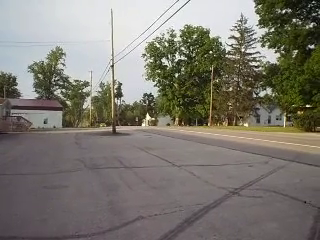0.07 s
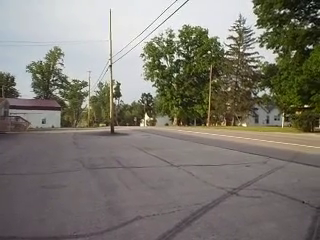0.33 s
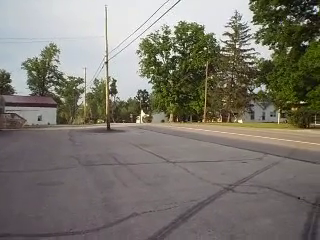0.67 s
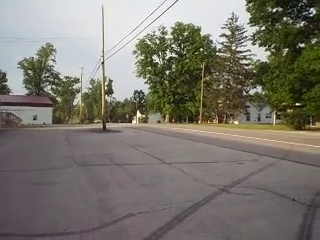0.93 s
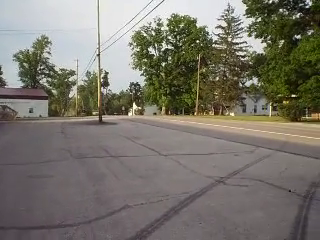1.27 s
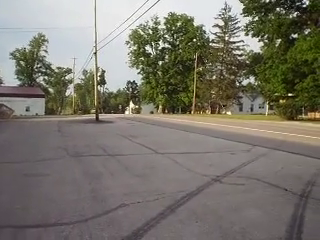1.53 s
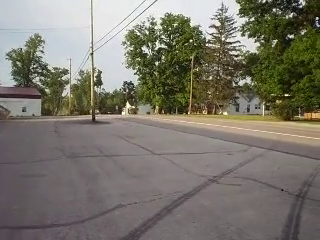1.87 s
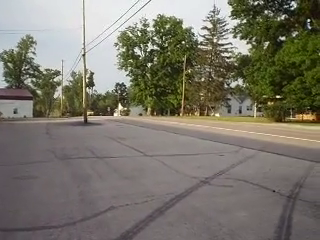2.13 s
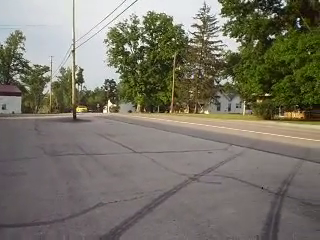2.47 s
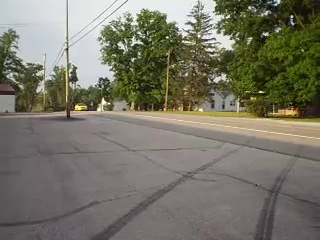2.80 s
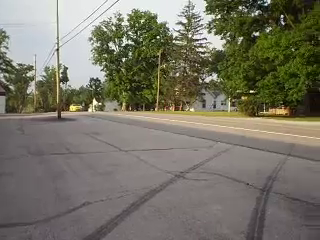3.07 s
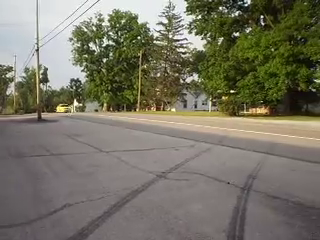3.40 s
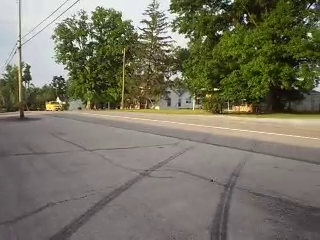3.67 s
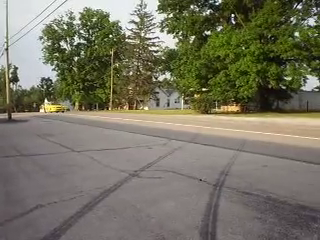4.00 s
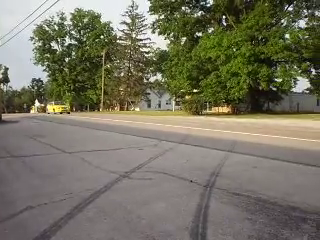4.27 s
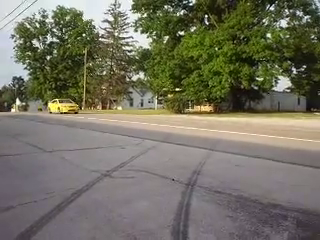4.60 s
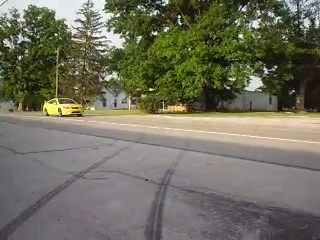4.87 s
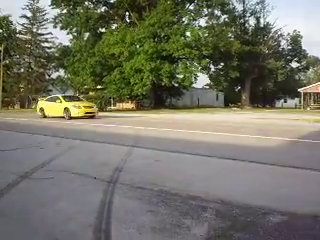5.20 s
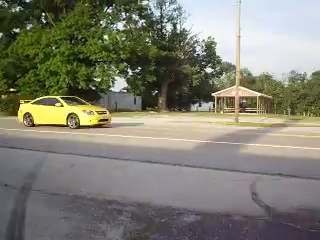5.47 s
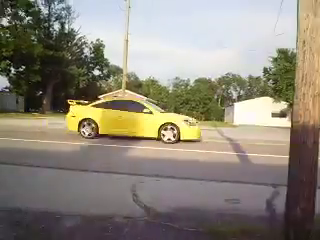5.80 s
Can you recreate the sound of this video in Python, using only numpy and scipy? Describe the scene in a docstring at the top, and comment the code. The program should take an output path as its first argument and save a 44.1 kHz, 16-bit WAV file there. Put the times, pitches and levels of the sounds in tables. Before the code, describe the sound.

Heard from the side of a country road, a faint engine hum builds into the raspy drone of an approaching car. A supercharger whine climbs with it, flaring over a growing rush of exhaust gas and tyres. Near the end the whine collapses, the engine pitch falls, and a quick string of exhaust pops sounds as the tyres roar close by. The sound is slightly muffled.

```python
"""A distant exhaust drone grows as a supercharged four-cylinder car accelerates along a rural road.
The firing note, the tailpipe rasp and the whine of the blower's rotors climb together over gas and
tyre noise, echoed by trees and by the houses left behind. As the car draws level the throttle shuts:
the whine collapses, unburnt fuel pops and burbles in the exhaust, and the tyres roar by."""
import sys
import numpy as np
from scipy import signal
from scipy.fft import rfft, irfft, next_fast_len
from scipy.io import wavfile

SR = 44100
rng = np.random.default_rng(int(sys.argv[2]) if len(sys.argv) > 2 else 0)


def generate_wav(signal):
    """Clip the signal to [-1, 1] and save it as 16-bit WAV at the path in sys.argv[1]."""
    frames = np.transpose(np.atleast_2d(signal))
    scaled = np.clip(frames, -1, 1) * 32767
    pcm = np.round(scaled).astype(np.int16)
    wavfile.write(sys.argv[1], SR, pcm)


N = 257544
TIME = np.arange(N) / SR
ABREAST_S, CAR_M_PER_S, LANE_DISTANCE_M = 5.666, 20.5, 13.38
OPEN_S, SHUT_S, SHUTTING_S = 2.37, 5.432, 0.062   # throttle: two midpoints, one duration
FULL_FIRING_HZ = 185


def from_db(db):
    """Decibels to gain."""
    return 10 ** (np.asarray(db) / 20)


def rms_one(x):
    """Scale to unit power."""
    return x / np.sqrt(np.mean(x ** 2) + 1e-20)


def in_time(curve):
    """A curve's value at every sample."""
    return np.interp(TIME, *np.transpose(curve))


def gain_at(spectrum, hz):
    """Gain of a spectrum at given frequencies."""
    freq_hz, level_db = np.transpose(spectrum)
    return from_db(np.interp(np.log(np.maximum(hz, 1)), np.log(freq_hz), level_db))


def coloured(x, spectrum):
    """Filter by a spectrum."""
    size = next_fast_len(N + SR // 10)
    gain = gain_at(spectrum, np.fft.rfftfreq(size, 1 / SR))
    return irfft(rfft(x, size) * gain, size)[:N]


def noise(spectrum):
    """Coloured noise of unit power."""
    return rms_one(coloured(rng.standard_normal(N), spectrum))


def band(x, kind, hz, order=4):
    """Butterworth filter."""
    return signal.sosfilt(signal.butter(order, hz, kind, fs=SR, output="sos"), x)


def drift(rate_hz):
    """Smooth random wander of unit spread."""
    hop, settle = 40, 2000
    pole = np.exp(-2 * np.pi * rate_hz * hop / SR)
    white = rng.standard_normal(N // hop + settle + 2)
    slow = signal.lfilter([1], [1, -2 * pole, pole * pole], white)[settle:]
    return np.interp(np.arange(N) / hop, np.arange(len(slow)), rms_one(slow))


def delayed(x, delay_s):
    """Delay a signal; a growing delay lowers its pitch."""
    return np.interp(TIME - delay_s, TIME, x, left=0)


def bell(x, centre, width):
    """Gaussian hump of height 1."""
    return np.exp(-((x - centre) / width) ** 2)


def ramp(middle_s, length_s):
    """Linear rise from 0 to 1."""
    return np.clip((TIME - middle_s) / length_s + .5, 0, 1)


# time_s, firing_hz
ENGINE_SPEED = [(0, 107.1), (1.2, 110.6), (1.6, 113.8), (1.92, 114.4), (2.35, 120.3), (2.8, 129.3),
                (3.15, 137.1), (3.75, 149.7), (4.15, 159.4), (4.5, 168.7), (4.85, 177.3), (5.2, 184.9),
                (5.41, 188.8), (5.5, 181.1), (5.84, 156.9)]


def firing_rate_hz():
    """Cylinder firings per second, as heard at the roadside."""
    return in_time(ENGINE_SPEED)


def car_level_db(full_db, per_octave_db, cruise_db, shut_db, lead_s=0.16, opening_s=0.89):
    """Source level from distance, revs and throttle; lead_s advances its response to the opening."""
    distance_m = np.hypot(CAR_M_PER_S * (ABREAST_S - TIME), LANE_DISTANCE_M)
    spreading_db = 20 * np.log10(LANE_DISTANCE_M / distance_m)
    revs_db = per_octave_db * np.log2(firing_rate_hz() / FULL_FIRING_HZ)
    cruising = 1 - ramp(OPEN_S - lead_s, opening_s)
    throttle_db = cruise_db * cruising + shut_db * ramp(SHUT_S, SHUTTING_S)
    return full_db + spreading_db + revs_db + throttle_db


# time_s, level_db
NOTE_LEVEL = [(0.0, -45.5), (1.01, -48), (1.3, -40), (1.69, -41.5), (2.44, -29.5), (2.81, -35), (2.89, -48),
              (2.94, -32.5), (3.11, -46), (3.32, -27), (4.2, -33.5), (4.31, -23), (4.68, -28),
              (4.83, -20.5), (5.01, -28.5), (5.19, -19), (5.29, -34.5), (5.34, -19.5), (5.4, -24),
              (5.43, -30), (5.59, -22.5), (5.84, -31)]
# time_s, level_db
OCTAVE_LEVEL = [(.3, -66), (.6, -55), (1.5, -51.5), (2.33, -53.5), (2.52, -43.5), (2.85, -37), (3.1, -43),
                (3.45, -39.5), (5.1, -31.5), (5.84, -41)]


def exhaust_drone(firing_phase, note_trim_db=-1, third_trim_db=-11):
    """The firing note and its octave swell and fade, with a faint third harmonic."""
    note_db, octave_db = in_time(NOTE_LEVEL), in_time(OCTAVE_LEVEL)
    note = from_db(note_db + note_trim_db + 1.8 * drift(16)) * np.sin(firing_phase)
    octave = from_db(octave_db + 2.5 * drift(6.7)) * np.sin(2 * firing_phase + 1)
    third = from_db(octave_db + third_trim_db + 2 * drift(5.9)) * np.sin(3 * firing_phase)
    return np.sqrt(2) * (note + octave + third)


# freq_hz, relative_db
TAILPIPE_RESPONSE = [(300, -10), (400, -11), (520, -13), (620, -10), (740, -4), (830, 0), (940, 5),
                     (1070, -8), (1450, -11), (2200, -20)]


def exhaust_rasp(firing_phase, firing_hz, uneven_db=-8.5, flutter_db=1.5, jitter_rad=0.055):
    """Higher orders ring in the tailpipe; unequal cylinders add weaker half orders between them."""
    out, power = 0, 0
    unsteady_phase = firing_phase + jitter_rad * drift(25)
    for k in range(7, 21):
        gain = gain_at(TAILPIPE_RESPONSE, firing_hz * k / 2) * from_db(uneven_db * (k % 2))
        flutter = from_db(flutter_db * drift(3.8))
        out += gain * flutter * np.sin(k / 2 * unsteady_phase + rng.uniform(0, 2 * np.pi))
        power += gain ** 2 / 2
    level_db = car_level_db(full_db=-16, per_octave_db=14.5, cruise_db=-14.5, shut_db=-8,
                            lead_s=0.057, opening_s=0.29)
    return from_db(level_db) * out / np.sqrt(power)


# harmonic, relative_db
ROTOR_HARMONICS = [(1, -11), (2, -4), (3, -10.5), (4, -3.5), (5, -15.5), (6, -9.5), (7, -14), (8, -13)]
# harmonic, centre_hz, half_width_hz, gain_db
# The negative row is a brief dip in the main whine from ground reflection.
WHINE_FLARES_AND_DIPS = [(2, 700, 40, 5.5), (2, 795, 35, 13), (2, 993, 100, 18), (3, 1540, 96, 18),
                         (4, 1507, 130, 13), (4, 1962, 126, 23), (4, 2058, 11.6, -20), (4, 2090, 15, 6.5),
                         (5, 2510, 86, 11.5), (6, 2523, 188, 16), (6, 2757, 110, 12), (6, 3090, 115, 13.5),
                         (7, 2872, 170, 17.5), (7, 3398, 220, 14), (8, 2690, 58, 15), (8, 3085, 42, 21.5),
                         (8, 3590, 130, 10.5)]


def supercharger(firing_phase, firing_hz, lobes_per_firing=2.775, belt_jitter_rad=0.045):
    """Two rotors chop the intake air; until the throttle shuts, harmonics flare at certain pitches."""
    whine_db = car_level_db(full_db=-28, per_octave_db=5, cruise_db=-24, shut_db=-18,
                            lead_s=0.11, opening_s=0.16)
    before_shut = 1 - ramp(SHUT_S, SHUTTING_S)
    lobe_hz = lobes_per_firing * firing_hz
    lobe_phase = lobes_per_firing * firing_phase + belt_jitter_rad * drift(39)
    out = 0
    for k, relative_db in ROTOR_HARMONICS:
        flare_db = sum(gain_db * bell(k * lobe_hz, centre_hz, half_width_hz)
                       for harmonic, centre_hz, half_width_hz, gain_db in WHINE_FLARES_AND_DIPS
                       if harmonic == k)
        flutter_db = (1.35 if k <= 4 else 2.5) * drift(16)
        gain = from_db(whine_db + relative_db + before_shut * flare_db + flutter_db)
        out += gain * np.sin(k * lobe_phase + rng.uniform(0, 2 * np.pi))
    return np.sqrt(2) * out


# freq_hz, density_db
RUMBLE_SPECTRUM = [(20, -9), (45, 1.5), (70, -2), (110, -1), (200, -15), (400, -21.5)]
# freq_hz, density_db
RUSH_SPECTRUM = [(150, -14.5), (300, -12), (450, -13.5), (600, -11.5), (720, -0.5), (880, 7.5),
                 (1120, -1.5), (1420, 3.5), (1750, -3.5), (2200, -7.5), (2700, -11.5), (3400, -12.5),
                 (4000, -21), (5000, -45)]


def gas_and_tyres(firing_phase, throb_depth=0.11, flutter_db=0.62, rumble_db=-10):
    """Turbulent gas, tyre noise and road rumble, throbbing a little with each firing."""
    low_db = car_level_db(full_db=-29.5, per_octave_db=6, cruise_db=-8, shut_db=-0.5)
    mid_db = car_level_db(full_db=-16, per_octave_db=8.5, cruise_db=-16, shut_db=-3)
    high_db = car_level_db(full_db=-22, per_octave_db=16, cruise_db=-7.5, shut_db=-1.5)
    out = from_db(low_db + rumble_db) * noise(RUMBLE_SPECTRUM)
    for edges_hz, level_db in ((170, 600), low_db), ((600, 1900), mid_db), ((1900, 4200), high_db):
        rush = rms_one(band(noise(RUSH_SPECTRUM), "band", edges_hz))
        out += rush * from_db(level_db + flutter_db * drift(49))
    return out * (1 + throb_depth * np.sin(firing_phase))


# freq_hz, density_db
AIR_SPECTRUM = [(20, -6.5), (60, 6), (90, -7.5), (160, -6.5), (350, -4.5), (600, -3.5), (780, -3.5),
                (940, -4), (1080, -1.5), (1450, -4.5), (1700, -9), (2300, -9), (3900, -9), (4600, -43)]


def still_air(level_db=-49):
    """Steady hiss of still outdoor air."""
    return from_db(level_db) * noise(AIR_SPECTRUM)


def with_tree_echoes(direct, echo_db=-11, nearest_s=0.03, farthest_s=0.17, sway_s=0.00027, count=6):
    """Direct sound plus echoes off the tree line, their paths slowly shifting as the car moves."""
    wet = from_db(echo_db)
    delays_s = np.linspace(nearest_s, farthest_s, count)
    echoes = sum(delayed(direct, delay_s + sway_s * drift(0.68)) for delay_s in delays_s)
    return (direct + wet * echoes / np.sqrt(count)) / np.sqrt(1 + wet ** 2)


# freq_hz, gain_db
HOUSE_RESPONSE = [(100, -17), (150, -0.5), (280, -2), (430, 4), (560, 11.5), (700, 8), (900, 2),
                  (1500, -4.5), (4000, 0)]


def house_echo(direct, firing_hz, first_delay_s=0.17, facing_s=4.063, half_width_s=0.98):
    """The car leaves the houses behind, so their echo is Doppler-shifted down, more so with speed."""
    doppler_drop = np.maximum(0.1085 + 0.00142 * (firing_hz - FULL_FIRING_HZ), 0)
    delay_s = first_delay_s + np.cumsum(doppler_drop) / SR
    off_axis = 1 - bell(TIME, facing_s, half_width_s)   # the tailpipe sweeps across the houses
    return from_db(2 - 23.5 * off_axis) * coloured(delayed(direct, delay_s), HOUSE_RESPONSE)


# start_s, crack_db, thump_db
FUEL_POPS = [(5.438, -17, -36), (5.449, -15, -28), (5.467, -13, -26), (5.493, -11, -27), (5.537, -19, -24),
             (5.612, -16, -38), (5.654, -18, -38), (5.709, -9.5, -22)]
# freq_hz, density_db
BURBLE_SPECTRUM = [(25, -20.5), (55, -12), (90, 1), (140, 4), (220, -3), (350, -19), (800, -38)]


def exhaust_pops(crack_s=0.0029, ring_hz=906, ring_db=-1, thump_hz=122.5, thump_decay_s=0.024,
                 burble_db=-7, burble_decay_s=0.11):
    """Unburnt fuel pops: each gas burst rings the tailpipe over a low thump and leaves it burbling."""
    gas, burble = noise(RUSH_SPECTRUM), noise(BURBLE_SPECTRUM)
    out = np.zeros(N)
    for start_s, crack_db, thump_db in FUEL_POPS:
        age_s = np.maximum(TIME - start_s, 0)
        ring = from_db(ring_db) * np.sin(2 * np.pi * ring_hz * age_s)
        crack_envelope = (age_s / crack_s) * np.exp(1 - age_s / crack_s)
        crack = crack_envelope * (gas + ring) / np.sqrt(2)
        thump = np.sin(2 * np.pi * thump_hz * age_s) * np.exp(-age_s / thump_decay_s)
        tail = from_db(burble_db) * burble * (age_s > 0) * np.exp(-age_s / burble_decay_s)
        out += from_db(crack_db) * crack + from_db(thump_db) * (thump + tail)
    return out


def scene():
    """One crankshaft drives the exhaust and the blower; mono."""
    firing_hz = firing_rate_hz()
    firing_phase = 2 * np.pi * np.cumsum(firing_hz) / SR
    drone = exhaust_drone(firing_phase)
    rasp = exhaust_rasp(firing_phase, firing_hz)
    whine = supercharger(firing_phase, firing_hz)
    roar = gas_and_tyres(firing_phase)
    car = drone + roar + exhaust_pops() + with_tree_echoes(rasp + whine)
    echo = house_echo(drone + rasp + from_db(-6.5) * roar, firing_hz)
    return (car + echo + still_air())[None]


def record(dry, converter_hz=8000, band_edge_hz=3850, clip_level=0.72):
    """A narrow-band converter mirrors the top of its band and clips the loudest peaks."""
    mirrored = dry * (1 + 2 * np.cos(2 * np.pi * converter_hz * TIME))
    narrow = band(mirrored, "low", hz=band_edge_hz, order=14)
    narrow = band(narrow, "low", hz=4350, order=20)
    clipped = np.clip(narrow, -clip_level, clip_level)
    return band(clipped, "low", hz=15800, order=16)


dry = scene()
out = record(dry)
generate_wav(out)
```